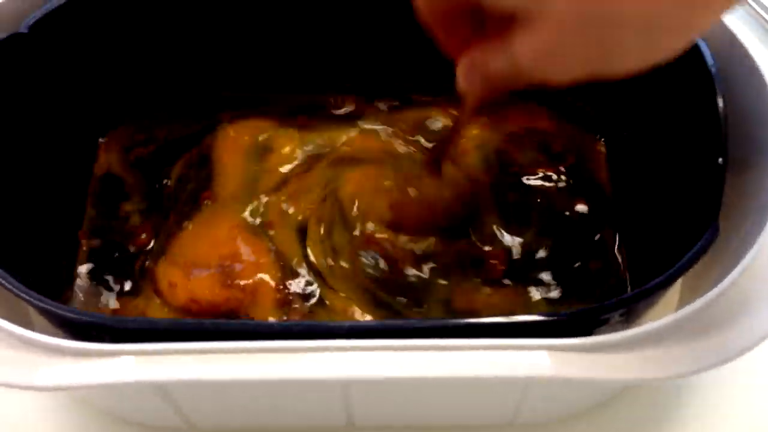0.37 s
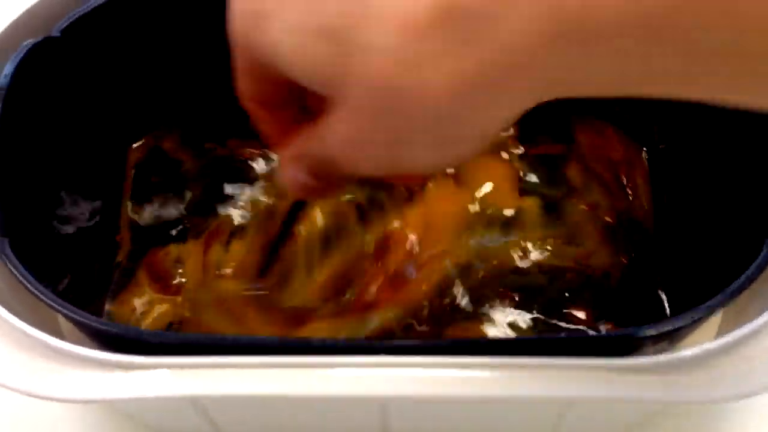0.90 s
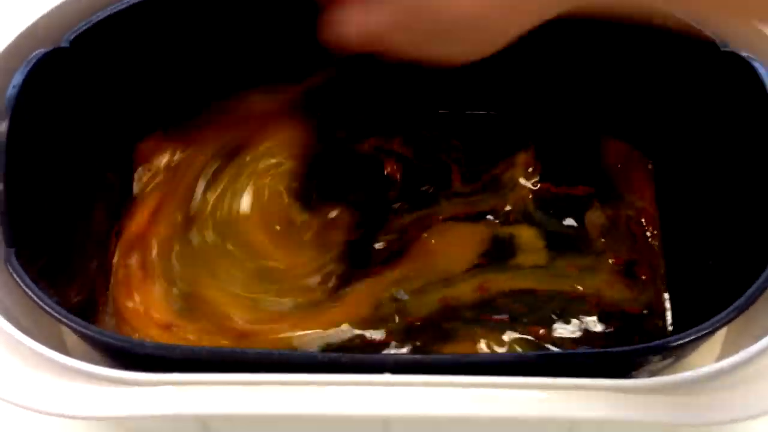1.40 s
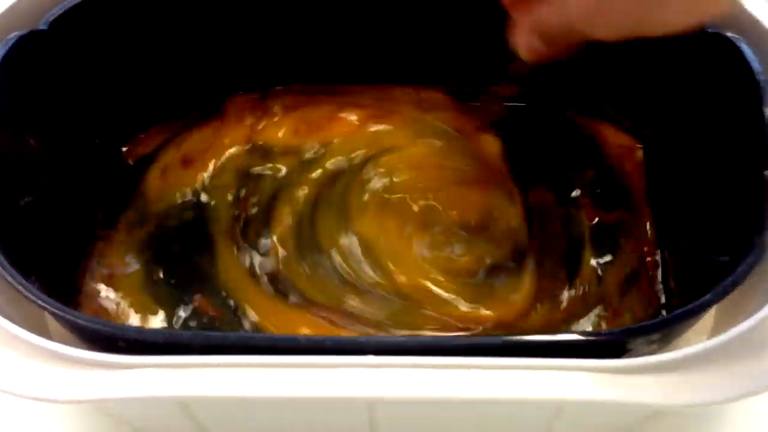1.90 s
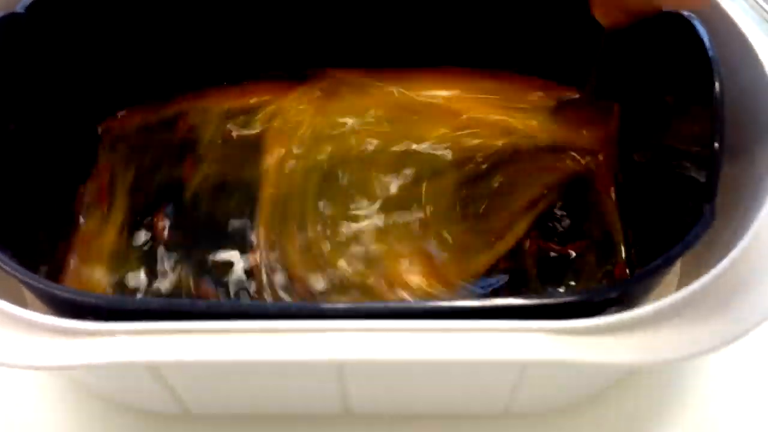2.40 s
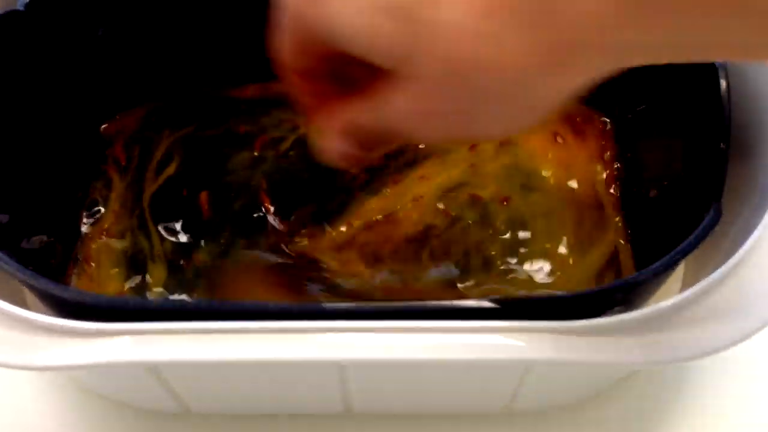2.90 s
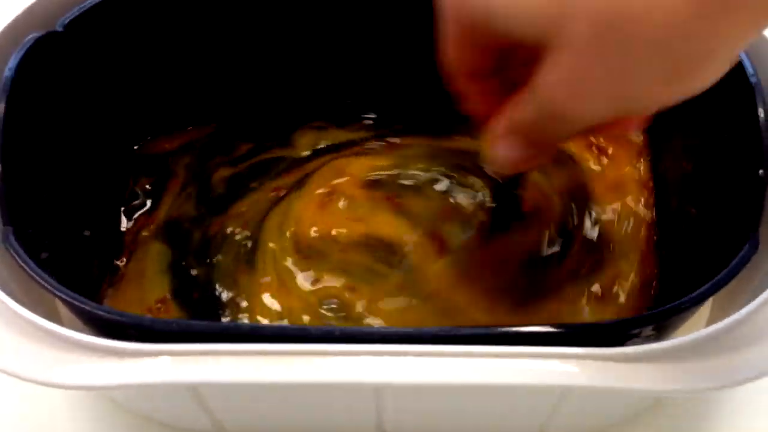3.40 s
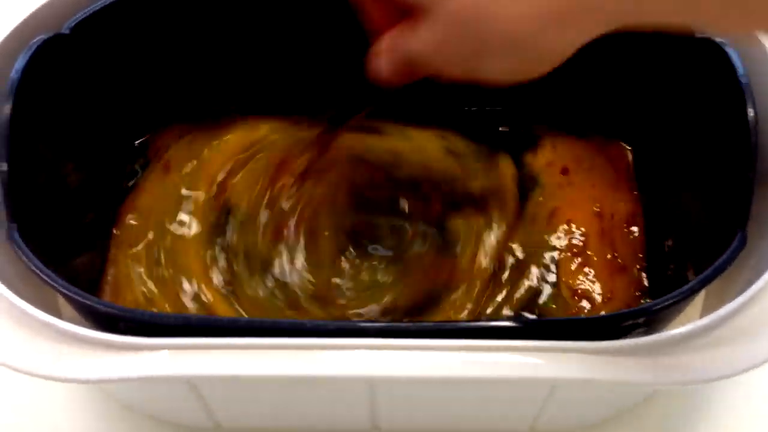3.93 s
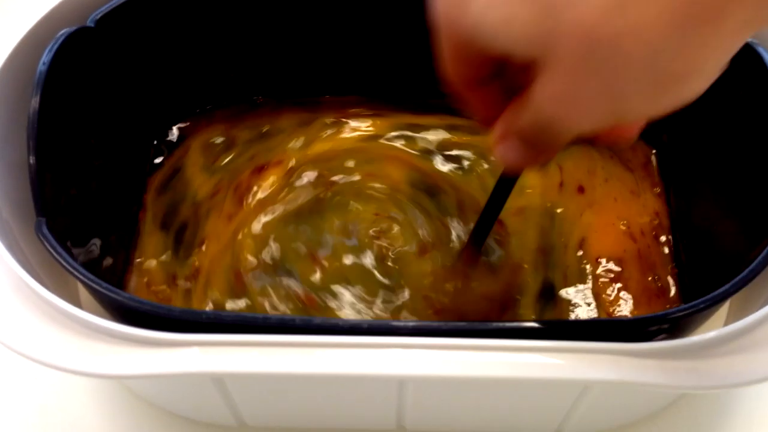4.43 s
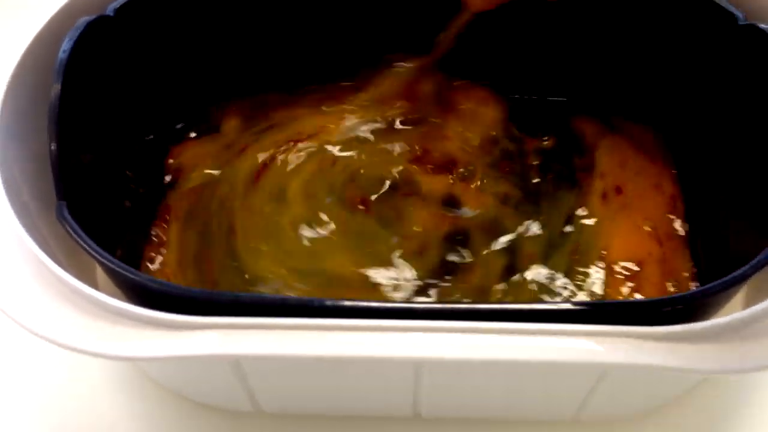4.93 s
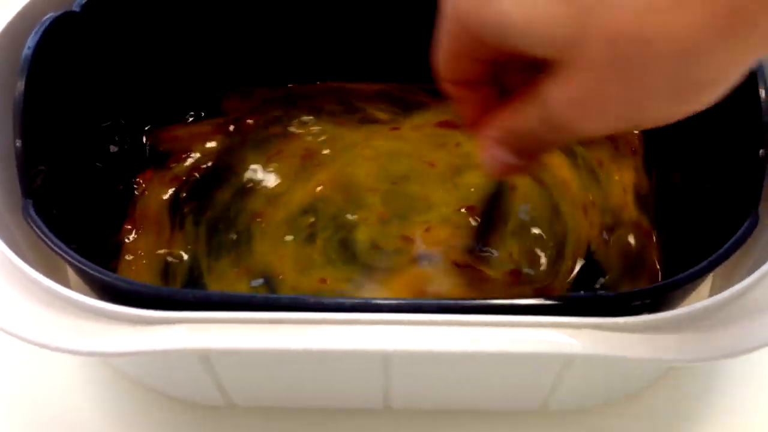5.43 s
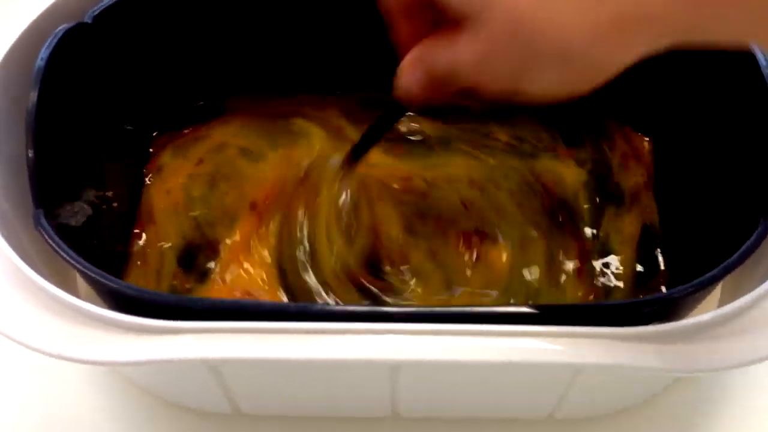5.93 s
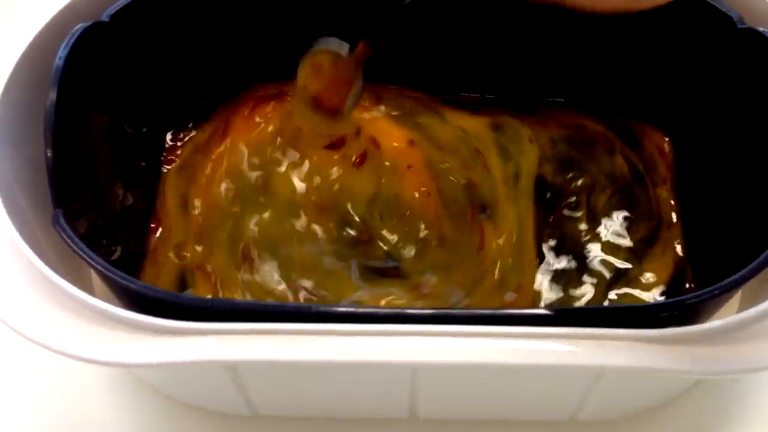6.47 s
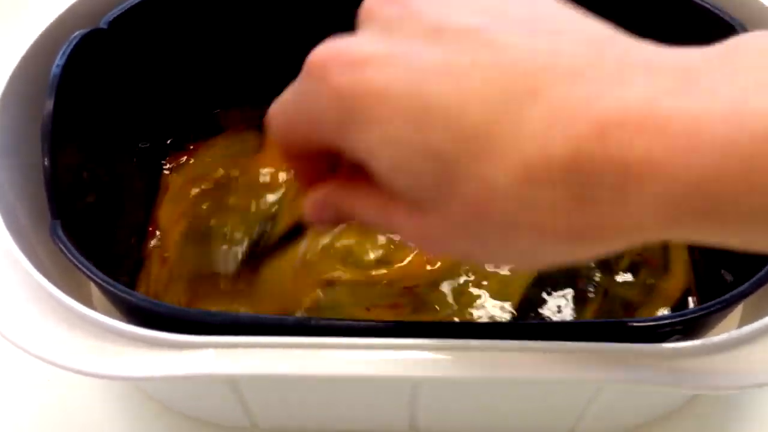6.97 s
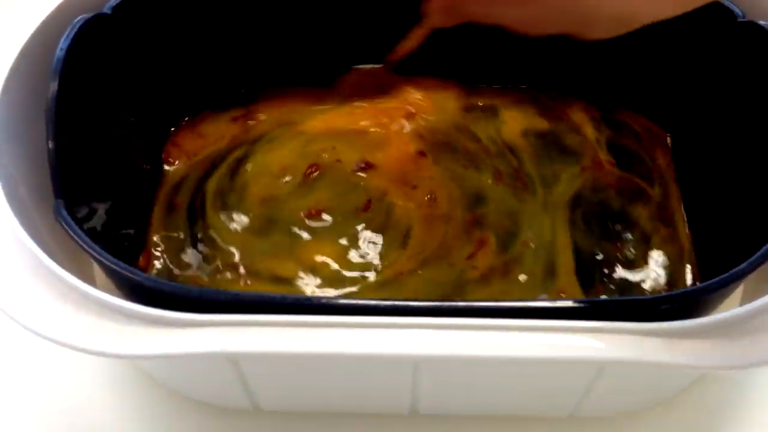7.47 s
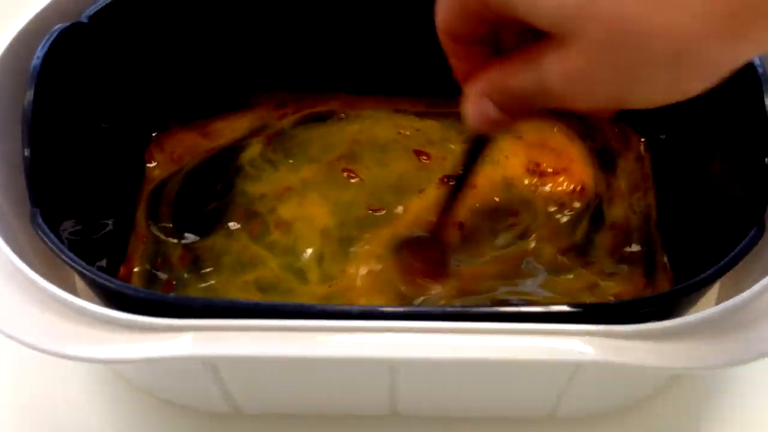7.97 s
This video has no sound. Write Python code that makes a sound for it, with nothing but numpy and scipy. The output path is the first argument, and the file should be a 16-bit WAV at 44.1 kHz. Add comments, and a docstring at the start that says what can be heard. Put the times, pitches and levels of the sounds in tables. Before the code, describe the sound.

Fast scratchy whisking of egg in a hollow plastic container, dull clacks and wet slosh up close, easing into sparser, quieter strokes.

```python
"""A metal spoon stirs raw egg in quick circles in a plastic tray: its edge catches and slips, ringing the tray's modes.
Filtered noise gives the hiss of sliding, delayed random taps the kitchen's echo; struck modes give the knocks.
Rising blips are bubbles, noise bursts the snapping films of egg, narrow-band noise the faint squeals of the edge.
Low noise is the tray rocking on the counter; steady coloured noise is room tone and microphone noise."""
import sys
import numpy as np
from scipy import signal
from scipy.fft import rfft, irfft
from scipy.io import wavfile
from scipy.ndimage import uniform_filter1d

SR = 44100
rng = np.random.default_rng(int(sys.argv[2]) if len(sys.argv) > 2 else 0)


def ratio(d):
    """dB to gain"""
    e = np.asarray(d, float) / 20
    return 10 ** e


def to_wav(s):
    """Save 16-bit WAV."""
    ch = np.atleast_2d(s).T  # columns
    pcm = np.round(np.clip(ch, -1, 1) * 32767)  # PCM
    wavfile.write(sys.argv[1], SR, pcm.astype(np.int16))


N = 357210  # samples, 8.1 s


def evened(x):
    """Normalization to unit root-mean-square level."""
    return x / np.sqrt(np.mean(x ** 2) + 1e-20)


def read(points, hz):
    """Interpolation of a curve along a logarithmic frequency axis."""
    f, value = np.transpose(points)
    return np.interp(np.log(hz + 1), np.log(f + 1), value)


def coloured(x, spectrum, tilt_db=0):
    """Linear filtering by a spectrum, tilted in dB an octave about roughly 3 kHz, at unit rms."""
    hz = np.fft.rfftfreq(len(x), 1 / SR)
    gain_db = read(spectrum, hz) + tilt_db * np.log2(hz / 3000 + 0.115)
    return evened(irfft(rfft(x) * ratio(gain_db), len(x)))


def slips(per_s, spread_db):
    """Poisson-like excitation: random contacts of random sign, a few much stronger."""
    strength_db = spread_db * np.minimum(rng.exponential(1, N), 4)
    size = ratio(strength_db) * rng.choice([-1., 1.], N)
    return size * (rng.random(N) < per_s / SR)


# sweeps of the circling spoon: fastest_s, run_up_s, run_out_s,
# speed_db (hiss above 5 kHz at the top), pressure_db (stutter at the top)
SWEEPS = [(0.351, 0.12, 0.12, -62, -33.5), (0.549, 0.084, 0.14, -56, -55), (0.759, 0.061, 0.12, -57, -34.5),
          (0.916, 0.058, 0.11, -58, -35), (1.117, 0.058, 0.13, -58, -35.5),
          (1.268, 0.088, 0.084, -62, -33.5), (1.492, 0.085, 0.079, -56.5, -38.5),
          (1.69, 0.013, 0.055, -79, -28.5), (1.744, 0.092, 0.14, -57, -47),
          (1.926, 0.08, 0.14, -57.5, -30.5), (2.13, 0.085, 0.14, -59.5, -37.5),
          (2.311, 0.092, 0.19, -61, -35.5), (2.56, 0.03, 0.2, -64.5, -44.5),
          (3.179, 0.12, 0.22, -65, -38.5), (3.504, 0.17, 0.18, -62.5, -33),
          (3.689, 0.11, 0.15, -61.5, -36.5), (3.873, 0.14, 0.13, -59, -37), (4.06, 0.098, 0.11, -59.5, -35),
          (4.209, 0.07, 0.085, -58, -36), (4.4, 0.12, 0.11, -62.5, -34.5), (4.558, 0.099, 0.12, -61, -44),
          (4.924, 0.13, 0.17, -65.5, -40.5), (5.36, 0.23, 0.22, -77.5, -50),
          (5.682, 0.088, 0.088, -63, -40.5), (5.78, 0.14, 0.087, -73.5, -34.5),
          (5.1, 0.45, 0.043, -86, -46), (.48, 0.017, 0.053, -70, -35), (6.087, 0.12, 0.11, -60.5, -37),
          (6.289, 0.11, 0.2, -60.5, -37), (6.979, 0.011, 0.17, -68.5, -39), (7.05, 0.07, 0.057, -64.5, -51),
          (7.31, 0.08, 0.3, -78, -45.5), (7.66, 0.098, 0.22, -89, -46.5), (7.9, 0.06, 0.13, -75, -74),
          (7.988, 0.026, 0.15, -72, -69)]
UP_CURVE, OUT_CURVE = 1.58, 1.25  # a sweep bites suddenly and holds near its top, then eases off


def sweeping(top_db, swing_db):
    """Addition of powers: each sweep climbs to its fastest point, then falls away."""
    t = np.arange(0, N + 64, 64) / SR
    s, up, out = np.transpose(SWEEPS)[:3, :, None]
    before = np.maximum((s - t) / up, 0) ** UP_CURVE
    after = np.maximum((t - s) / out, 0) ** OUT_CURVE
    level_db = top_db[:, None] - swing_db * (before + after)
    power = (ratio(level_db) ** 2).sum(0)
    return np.interp(np.arange(N) / SR, t, power)


# modes of the free tray, before load, dulling and pressing: mode_hz, level_db, t60_s
TRAY = [(300, -12, 0.19), (398.7, -8.5, 0.11), (564, -1.5, 0.055), (628, 2.5, 0.057), (701, -5, 0.041),
        (694.7, 2.5, 0.2), (750, 5, 0.097), (742, 2.5, 0.043), (850, 6, 0.065), (1090, 8, 0.033),
        (1264, -1.5, 0.054), (1190, -6, 0.045), (1465, 6.5, 0.0039), (1588, -9, 0.11), (1876, 3, 0.03),
        (1677, 2, 0.027), (1996, 2, 0.029), (2310, -6.5, 0.028), (2930, 0, 0.032), (3116, -6.5, 0.034),
        (3740, -7, 0.045)]


def ring(hardness, place, load, damping=1):
    """Modal superposition: place sets each mode's size, egg shifts its pitch, soft contact dulls it."""
    hz, db, t60 = np.transpose(TRAY)[:, :, None]
    t = np.arange(SR // 6) / SR
    softness = 1 - np.clip(hardness, 0, 1)
    dull_db = softness * 9 * np.log2(hz / 750)
    envelope = ratio(db - dull_db - 60 * t / (damping * t60))
    modes = place[:, None] * envelope * np.sin(2 * np.pi * hz * load[:, None] * t)
    contact = np.hanning(round(8 + 22 * softness))  # the push lasts a fraction of a millisecond
    sound = np.convolve(modes.sum(0), contact)[:len(t)]
    return sound / abs(sound).max()


CATCH_DB, CATCH_S = 4, .012  # the edge drags in uneven catches: depth and smoothing time


def stutter(level_db):
    """Stick-slip friction: each slip of the edge rings the tray from one of 16 random places."""
    catches = evened(uniform_filter1d(rng.standard_normal(N), round(CATCH_S * SR)))
    drive = slips(per_s=700, spread_db=5.5) * ratio(level_db + CATCH_DB * catches)
    place = np.repeat(rng.integers(0, 16, N // 800 + 1), 800)[:N]  # redrawn every 18 ms
    shapes, loads = rng.standard_normal((16, len(TRAY), 2)).transpose(2, 0, 1)
    rings = [ring(.15, shape, 1 + .045 * load, .7) for shape, load in zip(shapes, loads)]
    rung = sum(signal.oaconvolve(drive * (place == k), r)[:N] for k, r in enumerate(rings))
    return rung / np.sqrt(np.mean(rung ** 2) / np.mean(ratio(level_db) ** 2))


# spectrum of the sliding edge: frequency_hz, relative_level_db
HISS = [(500, -58), (900, -4), (1300, -4.5), (2350, -1.5), (2650, -6), (3250, -3), (4400, -6), (5200, -13),
        (8000, -18), (11000, -22.5), (16000, -26.5)]


def hiss(level_db):
    """Friction noise of egg and grit: noise and tiny ticks in shifting patches, brighter with speed."""
    grains = rng.standard_normal(N) + 0.71 * evened(slips(per_s=600, spread_db=4.0))
    hz, t, z = signal.stft(grains, SR, nperseg=256)
    across_bands = uniform_filter1d(rng.standard_normal(z.shape), size=6, axis=0)
    patches = evened(uniform_filter1d(across_bands, size=5, axis=1))
    flicker = evened(uniform_filter1d(rng.standard_normal(len(t)), size=2))
    speed_db = np.interp(t, np.arange(N) / SR, level_db) + 52.5
    bright_db = 0.11 * speed_db * np.log2(hz / 3500 + 0.037)[:, None]
    gain = ratio(3.65 * patches + 1.95 * flicker + bright_db)
    grit = coloured(signal.istft(z * gain, SR, nperseg=256)[1][:N], HISS)
    treble = signal.sosfilt(signal.butter(4, 5000, "high", fs=SR, output="sos"), grit)
    return ratio(level_db) * grit / treble.std()  # the level refers to the part above 5 kHz


# spectrum of a tick before its tilt: frequency_hz, relative_level_db
TICK = [(600, -21), (1500, 11), (4500, -4), (7000, -16.5), (11500, -21.5), (14500, -48), (16500, -60)]


def tick(tilt_db, t60):
    """Exponential decay of a noise crack, with a weaker spatter of 18 ms t60 added."""
    t = np.arange(800) / SR
    decay = ratio(-60 * t / t60) + 0.18 * ratio(-60 * t / 0.018)
    burst = coloured(rng.standard_normal(800), TICK, tilt_db) * decay
    return burst / abs(burst).max()


# spoon against tray: start_s, peak_db (radiated ring), tick_db (metal edge against that peak), hardness (0-1)
KNOCKS = [(0.04, -43.5, -40, 0.85), (0.142, -38, -9.5, 0.7), (0.3, -32.5, -49, 0.54),
          (0.33, -27, -45, 0.95), (0.462, -30, -35, 0.2), (0.514, -33.5, -14, 0.26),
          (0.547, -27.5, -42, 0.63), (0.567, -20.5, -28, 0.94), (0.72, -33, -29, 0.95),
          (0.75, -33, -30, 0.34), (0.785, -30, -17, 0.97), (0.817, -32.5, -38, 0.16),
          (0.876, -32.5, -30, 0.65), (0.918, -33.5, -26, 0.3), (1.097, -47, 1, 0.2),
          (1.137, -24, -26, 0.97), (1.17, -32, -28, 0.65), (1.231, -26, -35, 0.5), (1.272, -32.5, -23, 0.5),
          (1.454, -36, -14, 0.24), (1.593, -35, -36, 0.6), (1.669, -29, -33, 0.2), (1.767, -23, -8.5, 1),
          (1.779, -30.5, -28, 0.7), (1.789, -44, -32, 0.9), (1.903, -46, -33, 0.4),
          (1.927, -39.5, -26, 0.87), (1.98, -29, -46, 0.58), (2.088, -27.5, -10, 0.45),
          (2.157, -27.5, -37, 0.4), (2.17, -23.5, -15, 0.93), (2.192, -43, -33, 0.3), (2.293, -38, -29, 0),
          (2.5193, -19.5, 3, 0.75), (2.587, -32, -9, 0.9), (2.732, -39, -34, 0.7), (2.86, -41, -41, 0.6),
          (2.975, -35, -9.5, 0.67), (3.41, -33.5, -30, 0.77), (3.435, -29.5, -38, 0.13),
          (3.48, -33, -26, 1), (3.548, -23, -17, 0.83), (3.723, -32, -26, 0.46), (3.792, -31.5, -24, 0.38),
          (3.841, -27.5, -29, 0.76), (3.874, -23, -23, 0.67), (3.898, -26, -28, 0.9),
          (3.906, -23.5, -28, 0.94), (4.067, -35, -30, 0.3), (4.155, -32, -30, 0), (4.171, -30, -25, 0.15),
          (4.208, -24.5, -28, 1), (4.236, -38, -31, 0.8), (4.41, -30.5, -33, 0.4), (4.465, -29.5, -39, 0.2),
          (4.515, -33.5, -12, 0.55), (4.559, -34, -33, 0.65), (4.574, -26, -21, 0.64),
          (4.796, -29.5, -14, 0.67), (4.908, -33, -32, 0.9), (4.943, -44.5, -28, 0.7),
          (5.2555, -26.5, -7, 0.64), (5.623, -36, -16, 0.6), (5.701, -30.5, -33, 0.58),
          (5.742, -29.5, -11, 0.45), (5.762, -35, -35, 0.25), (5.888, -36.5, -24, 0.75),
          (6.084, -39, -24, 0.06), (6.138, -32, -45, 0.5), (6.21, -32, -49, 0.6), (6.222, -27.5, -42, 0.35),
          (6.246, -29, -36, 0.66), (6.263, -32, -38, 0.25), (6.294, -28, -26, 0.4), (6.316, -25, -31, 0.87),
          (6.963, -29.5, -11, 0.64), (6.99, -42, -29, 0.88), (7.16, -48.5, -38, 0.6),
          (7.253, -41.5, -18, 1), (7.292, -37.5, -12, 1), (7.613, -42.5, -32, 0.64), (7.87, -40, -8, 0),
          (7.922, -37, -21, 0.57), (7.975, -41.5, -26, 1), (7.992, -37.5, -34, 1), (8.082, -32, -13, 0.4)]
PRESSED = .48  # a knocking spoon stays on the plastic: share of the free ring time left
SWELL_S, SOFT_SWELL_S = 0.00077, 0.0051  # egg cushions a knock: build-up time, and extra for the softest


def knocks():
    """Impact excitation: a short metal tick, brighter when stronger, and the ring of the tray."""
    out = np.zeros(N + SR)
    places, loads = rng.standard_normal((len(KNOCKS), len(TRAY), 2)).transpose(2, 0, 1)
    for (s, db, tick_db, hardness), place, load in zip(KNOCKS, places, loads):
        swell_s = SWELL_S + SOFT_SWELL_S * (1 - np.clip(hardness, 0, 1))
        sound = ring(hardness, 1 + .55 * place, 1 + .035 * load, PRESSED)
        t = np.arange(len(sound)) / SR
        sound = sound * (1 - np.exp(-(t / swell_s) ** 1.5))
        sound = sound / abs(radiated(sound)).max()
        sound[:800] += ratio(tick_db) * tick(12.5 + 0.74 * tick_db, 0.0019)
        at = round(s * SR)
        out[at:at + len(sound)] += ratio(db) * sound
    return out[:N]


CHATTER_DB, CHATTER_T60_S = -17.5, 0.053  # a knock leaves the spoon chattering: level against its peak, decay


def chatter():
    """Exponential decay of power: the rattle that dies away after each knock."""
    blows = np.zeros(N)
    for s, db, *_ in KNOCKS:
        blows[round(s * SR)] = ratio(db + CHATTER_DB) ** 2
    return signal.lfilter([1], [1, -ratio(-2 * 60 / CHATTER_T60_S / SR)], blows)


def bubbles(level_db):
    """Bubble resonance: air folded into the egg gives rising blips of many sizes, louder with speed."""
    out = np.zeros(N)
    for hz in np.geomspace(600, 3000, 16):
        turns = np.arange(round(14 * SR / hz)) * hz / SR
        blip = np.sin(2 * np.pi * turns * (1 + 0.005 * turns)) * turns * np.exp(-turns / 2.2)
        out += signal.oaconvolve(slips(per_s=11, spread_db=4.0), blip)[:N] * (hz / 900) ** -.9
    return ratio(level_db + 16.5) * evened(out)


# wet films of egg snapping off the spoon: start_s, peak_db (before radiation)
SNAPS = [(2.716, -50.5), (2.794, -54), (2.9177, -51), (3.133, -41), (3.2997, -54), (4.464, -49),
         (4.846, -44.5), (4.884, -50), (5.339, -51), (5.376, -59), (5.915, -52), (6.436, -49), (7.03, -47),
         (7.113, -49.5), (7.668, -60), (7.696, -56), (7.887, -48.5)]


def snaps():
    """Impulsive rupture: each film of egg breaks with a thin bright click."""
    out = np.zeros(N + SR)
    for s, db in SNAPS:
        out[round(s * SR):][:800] += ratio(db) * tick(4.3, 0.038)
    return out[:N]


# the dragged edge sings faintly: start_s, length_s, from_hz, to_hz, level_db (before its fades)
SQUEALS = [(2.55, .17, 3350, 3250, -56), (4.57, .19, 2800, 2550, -56), (7.41, .13, 1800, 1780, -66),
           (4.905, .085, 1900, 1800, -45), (7.615, .14, 710, 660, -43), (5.115, .08, 690, 650, -41),
           (7.3, .065, 720, 730, -43), (6.975, .1, 1080, 1120, -48), (6.98, .075, 1950, 2000, -53)]
SQUEAL_WIDTH, SQUEAL_FADE_DB = .13, -8  # bandwidth of each pole as a share of the pitch; fade over the length


def squeals():
    """Narrow-band noise on a gliding carrier: fuzzy tones that fade as the drag slows."""
    out = np.zeros(N)
    for s, length, from_hz, to_hz, db in SQUEALS:
        u = np.arange(round(length * SR)) / (length * SR)
        r = np.exp(-np.pi * SQUEAL_WIDTH * from_hz / SR)
        noise = rng.standard_normal((SR // 2, 2)) @ [1, 1j]
        fuzz = signal.lfilter([1], np.poly([r, r, r]), noise)[-len(u):]
        turns = np.cumsum(from_hz + (to_hz - from_hz) * u) / SR
        tone = evened((fuzz * np.exp(2j * np.pi * turns)).real)
        out[round(s * SR):][:len(u)] += ratio(db + SQUEAL_FADE_DB * u) * np.sin(np.pi * u) ** .5 * tone
    return out


def radiated(x):
    """Radiation efficiency: a small tray sends out little low sound, here below 895 Hz."""
    return signal.sosfilt(signal.butter(3, 895, "high", fs=SR, output="sos"), x)


# spectrum of the rocking tray: frequency_hz, relative_level_db
THUD = [(40, -22), (80, -6.5), (140, 8.5), (200, 20.5), (240, 11.5), (295, 14), (400, 17), (480, 19),
        (700, -57)]
# heavier shifts of the tray: centre_s, length_s (to 1/e of the power), level_db
SHIFTS = [(2.88, 0.14, -63.5), (3.09, 0.11, -63.5), (4.45, 0.23, -70.5), (5.78, 0.047, -63),
          (5.93, 0.049, -63), (7.01, 0.033, -61), (8.004, 0.072, -72.5)]
# spectrum of those shifts: frequency_hz, relative_level_db
SHOVE = [(25, -45), (60, -25.5), (130, -3), (170, -1.5), (197, 8), (225, -2), (400, -5), (700, -55)]
ROCK_DB, ROCK_SHARE, ROCK_SMOOTH_S = -62, 0.45, 0.01  # rocking at -32.5 dB stutter; dB per dB; averaging time


def rocking(stutter_db):
    """Forced low-frequency motion: dull lumps of sound as the tray shifts on the counter."""
    t = np.arange(N) / SR
    smooth_db = uniform_filter1d(stutter_db, round(ROCK_SMOOTH_S * SR))
    rock = ratio(ROCK_DB + ROCK_SHARE * (smooth_db + 32.5))
    shifts = sum(ratio(db) ** 2 * np.exp(-((t - s) / length) ** 2) for s, length, db in SHIFTS)
    lumps = ratio(2.8 * evened(uniform_filter1d(rng.standard_normal(N), 1500)))
    thuds = rock * coloured(lumps * rng.standard_normal(N), THUD)
    shoves = np.sqrt(shifts) * coloured(rng.standard_normal(N), SHOVE)
    return thuds + shoves


# decay of the kitchen's echo: frequency_hz, t60_s
KITCHEN = [(250, 0.96), (700, 0.28), (2000, 0.7), (5000, 0.75), (12000, 0.078)]


def kitchen(x):
    """Reverberation: sparse taps of random sign, each band dying at its own speed, the treble weaker."""
    taps = np.zeros(SR)
    slots = np.arange(200, SR - 20, 20)  # one tap in every 20 samples
    taps[slots + rng.integers(0, 20, len(slots))] = rng.choice([-1., 1.], len(slots))
    hz, t, z = signal.stft(taps, SR, nperseg=256)
    hz = hz[:, None]
    decay = ratio(-60 * t / read(KITCHEN, hz))
    tail = signal.istft(z * decay / (1 + (hz / 3500) ** 2), SR, nperseg=256)[1]
    return signal.fftconvolve(x, tail / np.linalg.norm(tail))[:N]


# spectrum of room tone and microphone noise: frequency_hz, relative_level_db
AIR = [(24, -69), (40, -28), (112, -8.5), (167, 6.5), (199, 5.5), (231, 5.5), (283, 10), (491, -10),
       (585, -5), (852, -3), (4680, -13), (6330, -13.5), (16000, -17)]


def air():
    """Stationary random noise: room tone and microphone noise at a steady -72 dB."""
    return ratio(-72) * coloured(rng.standard_normal(N), AIR)


def scene():
    """Superposition of spoon and tray, their echo, the rocking and the steady air."""
    speed_db, pressure_db = np.transpose(SWEEPS)[3:]
    # swing: how far each falls over one run-up or run-out, dB
    hiss_db = 10 * np.log10(sweeping(speed_db, swing_db=27) + 1e-11)
    stutter_db = 10 * np.log10(sweeping(pressure_db, swing_db=13) + chatter() + 1e-10)
    spoon = stutter(stutter_db) + hiss(hiss_db) + bubbles(hiss_db) + knocks() + snaps() + squeals()
    heard = spoon + ratio(-11) * kitchen(spoon)
    return (radiated(heard) + rocking(stutter_db) + air())[None]


def band_limit(x):
    """A steep low-pass at the top of the band."""
    return signal.sosfilt(signal.butter(12, 16550, fs=SR, output="sos"), x)


def record(dry):
    """Band limitation: a linear-phase low-pass at 16 kHz finishes the mix."""
    lowpass = signal.firwin(511, 16000, window=("kaiser", 9), fs=SR)
    limited = signal.oaconvolve(dry, lowpass[None], "same")
    return band_limit(limited)


dry = scene()
out = record(dry)
to_wav(out)
```